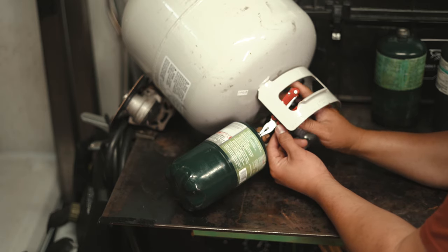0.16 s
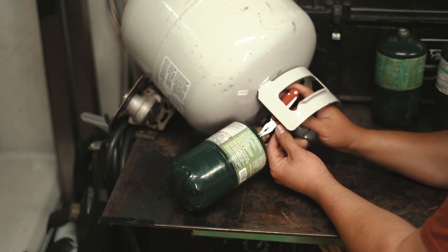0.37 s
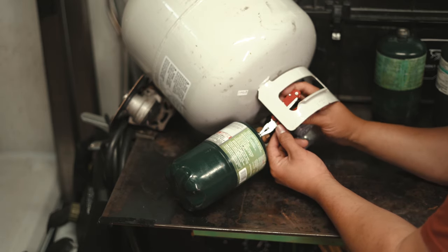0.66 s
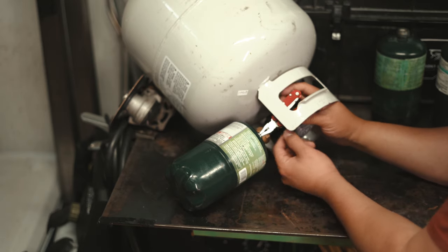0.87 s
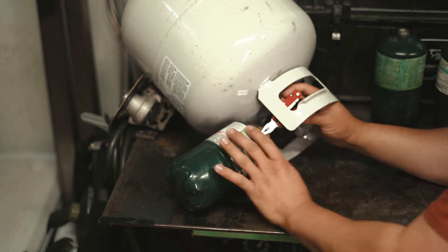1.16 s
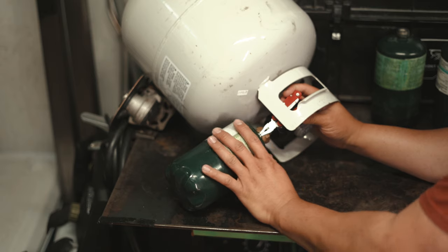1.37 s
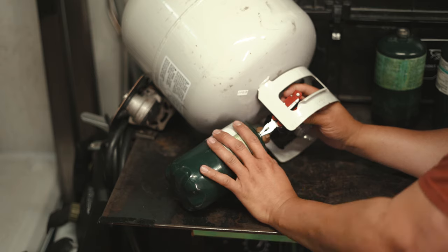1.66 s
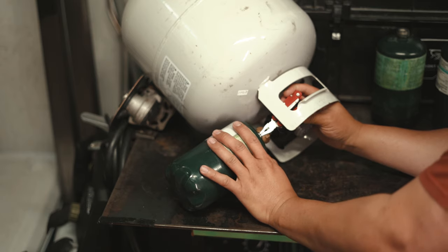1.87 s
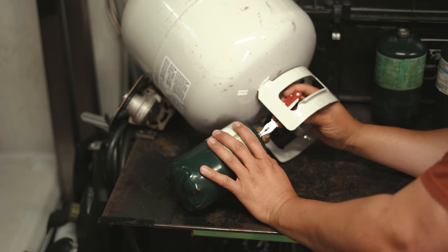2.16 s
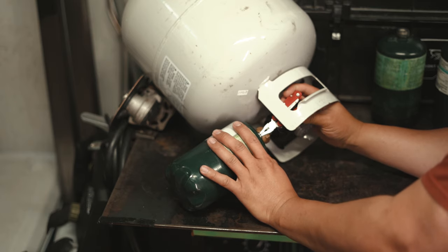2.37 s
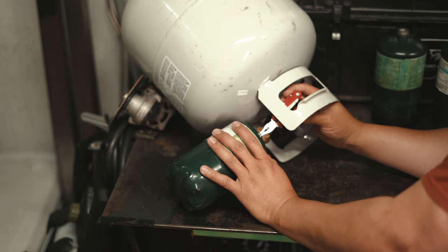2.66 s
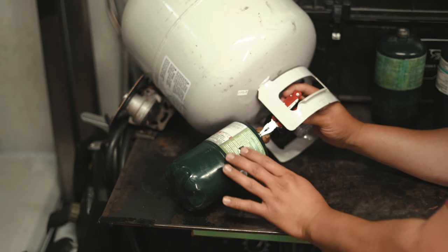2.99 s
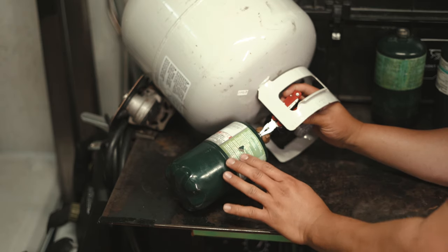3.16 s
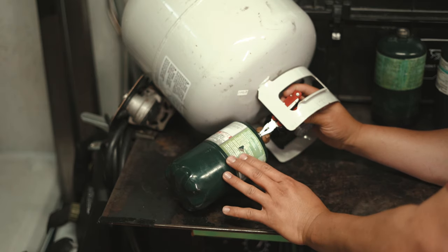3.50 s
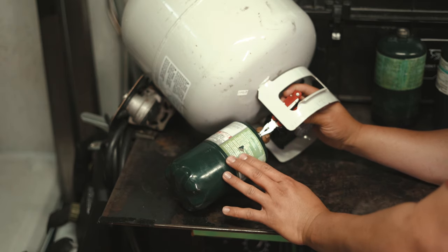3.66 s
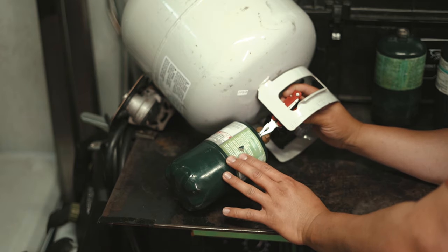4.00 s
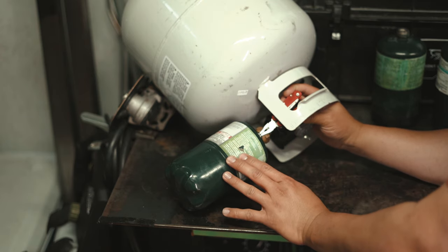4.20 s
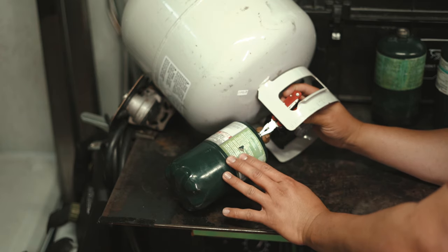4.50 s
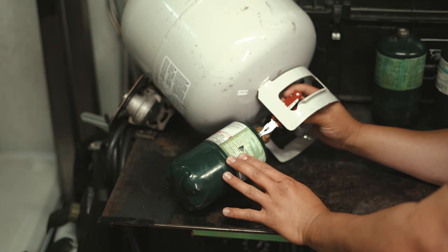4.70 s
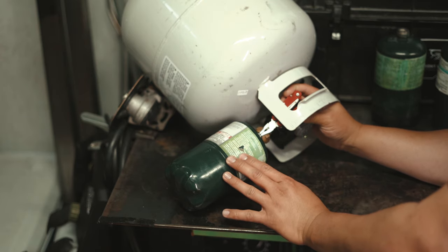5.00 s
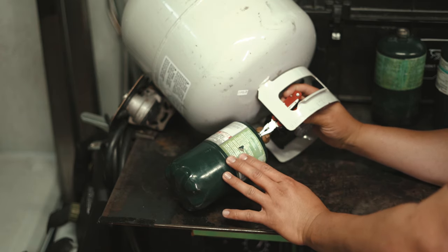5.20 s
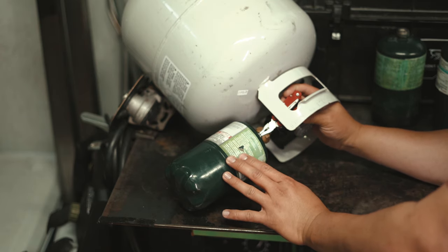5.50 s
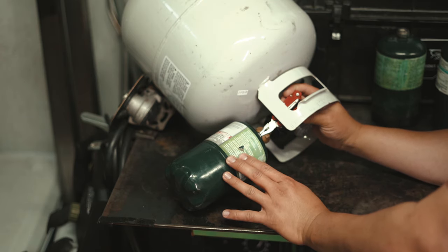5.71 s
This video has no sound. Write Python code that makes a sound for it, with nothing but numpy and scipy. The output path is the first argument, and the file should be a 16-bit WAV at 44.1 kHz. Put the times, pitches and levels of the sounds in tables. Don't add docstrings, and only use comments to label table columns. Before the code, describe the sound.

Low, soft machinery rumble fills a small workshop, recorded close. From 0 to 1.6 seconds, dry skin and a tool scrape a brass fitting in short, patchy rubs, with crisp clicks at about 0.5, 1.0, 1.2 and 1.4, the strongest near 1.0 and 1.2, ringing only briefly. A faint leak precedes a hard gas blast from 1.8 to 2.35: dense, bright hiss with narrow whistling cavity tones and a slight steel hum. It drops to weak seepage, with sharp, wet spits and dull little thuds from 2.4 to 2.95, then an airy hand swish and one more spit near 3.35. Further blasts come at 3.6-3.8, 4.2-4.7, 4.95-5.2 and 5.6-5.9, snapping on and closing quickly; the third sags and stutters, the fourth swells slightly, the last fades somewhat. Liquid roughens the last three onsets. Automatic gain ducks the rumble under each blast, and it returns in the gaps.

```python
import sys
import numpy as np
from scipy import signal
from scipy.fft import rfft, irfft
from scipy.io import wavfile
from scipy.ndimage import uniform_filter1d, map_coordinates

SR = 44100
rng = np.random.default_rng(int(sys.argv[2]) if len(sys.argv) > 2 else 0)


def to_wav(s):
    ch = np.atleast_2d(s).T
    pcm = np.round(np.clip(ch, -1, 1) * 32767)
    wavfile.write(sys.argv[1], SR, pcm.astype(np.int16))


def makeup_ratio(level_db):
    decades = np.asarray(level_db, float) / 20
    return 10 ** decades


N = 257984

# frequency in Hz, level in dB per Hz.
ROOM_COLOUR = [(15, -35), (25, -5.5), (113, -2), (300, -16), (372, -12.5), (438, -17.5), (860, -15),
               (1100, -18), (1190, -17), (1740, -23.5), (2150, -25.5), (2530, -31), (2900, -28.5),
               (5250, -37.5), (15900, -29)]
# frequency in Hz, width in Hz, boost in dB.
ROOM_MODES = [(66.5, 4.5, 3.5), (111.7, 4.7, 3.5), (142.4, 7.9, 2.5)]
# frequency in Hz, level in dB per Hz.
RUB_COLOUR = [(1500, -5.5), (3000, -2), (5000, -1.5), (8000, 3), (12000, -9), (15800, -3)]
# start in seconds, level in dB, seconds to lose 30 dB,
# top octave in dB over the level.
SCRAPES = [(0.0, -38.5, 0.25, -4), (.134, -45.5, 0.3, -4), (0.422, -38.5, 0.12, -5), (.526, -41, 0.16, 3),
           (.594, -40.5, 0.3, -2), (.814, -47, 1.1, -2), (1.006, -37.5, 0.24, -10), (1.192, -39, 0.63, 0.5),
           (1.566, -43, 0.15, -5)]
# start in seconds, length in seconds, level in dB,
# top octave in dB over the level.
SLIDES = [
    (0.883, 0.093, -38.5, 4.5),
    (1.12, 0.11, -55.5, -7),
    (1.192, 0.054, -53, 6),
    (1.3, 0.072, -44, 3),
    (1.38, 0.12, -46, -1),
    (1.252, 0.29, -55, 1),
    (2.957, 0.11, -40.5, 12),
]
# time in seconds, low edge in
# Hz, high edge in Hz, level in dB.
WISPS = [(.28, 4100, 5200, -62), (1.37, 4600, 6300, -50), (3.16, 13000, 14600, -36),
         (3.63, 9000, 10300, -32), (4.46, 13700, 15200, -23), (4.58, 14400, 15900, -26),
         (4.58, 9400, 11200, -30), (4.58, 6850, 8350, -28), (5.62, 6450, 8200, -21)]
# time in seconds, peak in dB, centre in Hz, shell ring in dB over
# the peak, brass ring in dB over the peak.
TAPS = [(0.1321, -34, 3650, -26, -21), (0.4205, -33, 4220, -29, -20), (0.5244, -12, 12300, -46, -19),
        (0.595, -23.5, 5730, -26, -20), (0.8139, -23, 3460, -21, -12.5), (0.8969, -27, 5570, -28, -16),
        (1.0045, -9, 7400, -25.5, -7), (1.1468, -27.5, 2720, -20, -24), (1.193, -8.5, 8550, -24.5, -14.5),
        (1.4187, -18, 8630, -28, -28), (1.5673, -40, 4550, -26, -23), (1.6963, -33, 8500, -40, -16.5)]
# time in seconds, peak in dB, centre in Hz.
FIRST_TOUCH = [
    (.999, -24, 5000),
]
# frequency in Hz, level in dB, T60 in seconds.
BRASS_MODES = [
    (3460, -9.5, 0.067),
    (6230, -8, .04),
    (6720, 4.5, 0.01),
    (7240, -5.5, 0.04),
    (8450, -13, 0.021),
]
# start in
# seconds, length in seconds, frequency in Hz, level in dB, T60 in seconds.
HUMS = [(1.12, .1, 2820, -57, 0.026), (1.25, 0.31, 2850, -51, .03), (1.679, 0.083, 9650, -39, 0.0017),
        (1.688, 0.071, 6300, -40, 0.0033), (1.798, 0.57, 1883, -33, 0.16), (2.39, 0.49, 1858, -48, 0.26),
        (3.187, 0.31, 678, -49, 0.2), (3.882, 0.21, 1350, -50, 0.2), (3.897, 0.085, 2480, -42, 0.13),
        (4.68, 0.23, 1220, -47.5, 0.19), (5.247, 0.41, 371, -49, 0.46), (5.253, 0.26, 1331, -44.5, 0.32),
        (5.3, 0.27, 1098, -49, 0.17)]
# time in seconds, kick in dB.
NUDGES = [
    (3.005, -34),
    (3.025, -32),
    (3.045, -28),
]
# fully open in seconds, let go in seconds,
# dB when open, dB when let go, opening speed in dB per second.
PULLS = [
    (1.797, 2.339, -1, 2, 560),
    (3.608, 3.828, 3, 3, 240),
    (4.18, 4.671, 7.5, -5, 598),
    (4.946, 5.196, 6, 8, 327),
    (5.587, 5.9, 7.5, 1, 284),
]
# time in seconds, core level in dB.
LEAK = [(1.675, -71), (1.69, -46.5), (1.73, -50.5), (2.45, -26.5), (2.52, -30.5), (2.7, -27.5),
        (2.95, -29.5), (3.07, -32), (3.25, -33.5), (3.4, -30), (3.5, -24), (3.97, -36.5), (4.12, -28),
        (4.7, -18.5), (4.81, -24.5), (4.9, -20), (5.33, -32.5), (5.45, -32.5)]
# core in dB, then roar, fringe and whistle in dB over it.
REGISTER_LAW = [(-31, -8.5, -5, 4.5), (-25.5, -9.5, -8, 0), (-20, -17.5, -9.5, -3), (-6, -23, -12, -7.5),
                (3, -19, -6.5, -7), (16.5, -19.5, -5.5, -3.5)]
SPLITS_HZ = (3080, 7450, 13650)
# frequency in Hz, level in dB per Hz.
JET_COLOURS = [
    [(180, -58), (300, -32), (583, -23), (1550, -23.5), (1930, -19), (2470, -18.5), (4350, -5), (4730, -2.5), (6070, -3.5), (8740, -13), (12200, -14), (14600, -9), (15900, -18)],
    [(180, -40), (300, -31.5), (913, -20), (1500, -20), (3120, -13), (3570, -10), (4890, 0.5), (5490, -2.5), (5970, -0.5), (9660, -19), (13200, -18.5), (14400, -10.5), (15900, -11)],
    [(180, -28), (300, -18), (360, -4), (603, -6), (666, 0.5), (773, -19.5), (1320, -5), (3810, -3.5), (5580, -2), (8050, -3.5), (9820, -12.5), (14400, -8), (15900, -8)],
]
# frequency in Hz, width in Hz,
# dB over the jet.
FIRST_GRIP = [(3640, 130, 5), (3960, 61, 6), (4380, 130, 12), (4890, 50, 7.5), (5140, 110, 4.5),
              (5560, 110, 10), (5900, 48, 8.5), (6170, 300, 10), (6860, 60, 0), (9330, 150, 9.5),
              (11300, 90, -4), (12300, 200, -5), (14200, 90, 3), (14900, 270, 4)]
# frequency in Hz, width in Hz, dB over the jet.
SECOND_GRIP = [(3527, 93, 6), (3780, 59, 9), (4150, 45, 8), (4630, 20, 5.5), (4924, 83, 6), (5125, 17, 9.5),
               (5880, 27, 9), (6020, 95, 8), (6540, 110, -2.5), (6780, 120, 7.5), (8050, 88, 2),
               (8500, 220, -10), (13000, 540, 8.5), (14300, 300, 8)]
# frequency in Hz, width in Hz, dB over the jet.
NEARLY_SHUT = [(4520, 100, 4), (5120, 99, 9), (5550, 480, 8.5), (6170, 260, 7.5), (7200, 500, -2),
               (7930, 160, 6), (8500, 250, 3), (9300, 180, 8), (13000, 400, 7), (13400, 300, 3),
               (14200, 150, 10), (14800, 220, 5), (15500, 160, 6)]
HAND_MOVES_S = (2.94, 3.4)
HAND_DB = (-1, -1.1, 1, 0.6)
WET_AT_S = (4.185, 4.97, 5.575)
WET_DB = (9, -1.5, 0, -2)
# start in seconds, length in seconds, extra depth in dB.
STUTTER_FITS = [
    (2.58, .48, .9),
    (4.53, .46, .9),
]
# time in seconds, peak in dB, thud in dB over the peak.
DROPS = [(2.4423, -7.5, -8.5), (2.4567, -13, -7), (2.6457, -13, -5.5), (2.6601, -11.5, -4.5),
         (2.6824, -21, -10), (2.696, -15, -10), (2.7043, -18, -13), (2.729, -5.5, -12), (2.7527, -5.5, -14),
         (2.8492, -10, -8.5), (2.8783, -15, -3), (2.9203, -7.5, -13), (2.9552, -12, -23), (3.36, -16, -7)]
# jet core in the air in dB, gain in dB.
GAIN_LAW = [(-14.5, -0.03), (-7, -6.5), (2, -18.5), (16.5, -33)]


def unit(x):
    return x / np.sqrt(np.mean(x ** 2))


def curve(table):
    s, *columns = np.transpose(table)
    return [np.interp(np.arange(N) / SR, s, column) for column in columns]


def colour(x, points):
    hz, db = np.transpose(points)
    bins = np.arange(N // 2 + 1) * SR / N + 1
    return irfft(rfft(x) * makeup_ratio(np.interp(np.log(bins), np.log(hz), db)), N)


def band(x, lo_hz, hi_hz, order=2):
    sos = signal.butter(order, [lo_hz, min(hi_hz, .45 * SR)], "bandpass", fs=SR, output="sos")
    return signal.sosfilt(sos, x)


def resonate(x, modes):
    hz = np.arange(N // 2 + 1) * SR / N
    return rfft(x) * makeup_ratio(sum(db / (1 + (2 * (hz - f) / width) ** 2) for f, width, db in modes))


def ring(x, hz, t60):
    pole = np.exp(2j * np.pi * hz / SR - np.log(1000) / (t60 * SR))
    return signal.lfilter([1], [1, -pole], x).imag


def kicks(times, db):
    x = np.zeros(N)
    x[(np.asarray(times) * SR).astype(int)] = makeup_ratio(db)
    return x


def crack(s, db, hz, t60, spread):
    t = np.arange(2048) / SR
    push = rng.standard_normal(len(t)) * 1000 ** (-t / t60)
    push[0] = 6
    burst = band(push, hz / spread, hz * spread)
    x = np.zeros(N)
    start = int(s * SR)
    x[start:start + len(t)] = makeup_ratio(db) * burst / np.abs(burst).max()
    return x


def walk(rate):
    hold = int(SR / rate)
    steps = np.repeat(rng.standard_normal(N // hold + 1), hold)
    return unit(uniform_filter1d(uniform_filter1d(steps, hold), hold)[:N])


def window(s, length):
    t = np.arange(N) / SR - s
    return np.clip(np.minimum(t, length - t) / min(.03, length / 2), 0, 1)


def lag(x, s):
    keep = np.exp(-1 / (s * SR))
    return x[0] + signal.lfilter([1 - keep], [1, -keep], x - x[0])


def room():
    level_db, swell_db = -36.5, 1.6
    noise = unit(irfft(resonate(colour(rng.standard_normal(N), ROOM_COLOUR), ROOM_MODES), N))
    bass = band(noise, 23, 250)
    return makeup_ratio(level_db) * (noise + bass * (makeup_ratio(swell_db * walk(9)) - 1))


def rub():
    rise_s, body_ceiling_db = .014, -35
    t = np.arange(N) / SR
    strokes = []
    for s, db, fall_s, top_db in SCRAPES:
        drop_db = 30 * np.maximum((s - t) / rise_s, (t - s) / fall_s)
        strokes.append((makeup_ratio(db - drop_db), top_db))
    for s, length, db, top_db in SLIDES:
        strokes.append((makeup_ratio(db) * window(s, length) ** 2, top_db))
    body = sum(stroke for stroke, _ in strokes)
    top = sum(stroke * makeup_ratio(top_db) for stroke, top_db in strokes)
    noise = colour(rng.standard_normal(N), RUB_COLOUR)
    body_hiss = np.minimum(body, makeup_ratio(body_ceiling_db)) * unit(band(noise, 790, 7600))
    top_hiss = top * unit(band(noise, 8900, 14800))
    return (body_hiss + top_hiss) * makeup_ratio(walk(90))


def wide_air():
    noise = rng.standard_normal(N)
    wisps = sum(makeup_ratio(db) * window(s - .015, 0.031) * unit(band(noise, lo, hi, order=8))
                for s, lo, hi, db in WISPS)
    hiss = unit(band(noise, 10900, 22000, order=4))
    return wisps + makeup_ratio(-63.5) * window(-0.98, 2.7) * hiss


def clicks():
    s, db, hz, _, brass_db = np.transpose(TAPS)
    blows = kicks(s, db + brass_db)
    brass = sum(makeup_ratio(mode_db) * ring(blows, f, t60) for f, mode_db, t60 in BRASS_MODES)
    snap = sum(crack(*row, .002, 2.6) for row in [*zip(s, db + 3, hz), *FIRST_TOUCH])
    rattle = sum(crack(*row, 0.053, 1.13) for row in zip(s, db - 9.5, hz))
    return snap + rattle + brass


def shell():
    shell_hz, shell_t60_s = 1868, .27
    hum = sum(makeup_ratio(db + walk(20)) * window(s, length) * unit(ring(rng.standard_normal(N), hz, t60))
              for s, length, hz, db, t60 in HUMS)
    s, db, _, shell_db, _ = np.transpose(TAPS)
    blows = kicks(s, db + shell_db) + kicks(*np.transpose(NUDGES))
    return hum + ring(blows, shell_hz, shell_t60_s)


def flow_db():
    closing_db_per_s = 359
    t = np.arange(N) / SR
    levels = curve(LEAK)
    for on, off, on_db, off_db, opening_db_per_s in PULLS:
        held_db = np.interp(t, (on, off), (on_db, off_db))
        opening_db = opening_db_per_s * np.maximum(on - t, 0)
        levels.append(held_db - opening_db - closing_db_per_s * np.maximum(t - off, 0))
    return 10 * np.log10(sum(makeup_ratio(db) ** 2 for db in levels))


def cavities(points, modes):
    hz = np.arange(N // 2 + 1) * SR / N
    spectrum = resonate(colour(rng.standard_normal(N), points), modes)
    below = [0] + [1 / (1 + (hz / f) ** 16) for f in SPLITS_HZ] + [1]
    return np.array([unit(irfft(spectrum * (hi - lo), N)) for lo, hi in zip(below, below[1:])])


def jet():
    colour_lag_s = 0.036
    dry_colour_db = -22.5
    shut_db, open_db = -26, -19.5
    wet_s, stutter_db = 0.22, .4
    t = np.arange(N) / SR
    core_db = flow_db()
    felt_db = np.maximum(core_db, lag(core_db, colour_lag_s))
    felt_db = np.where(t < PULLS[0][0], np.maximum(felt_db, dry_colour_db), felt_db)
    at_db, *law = np.transpose(REGISTER_LAW)
    roar_db, fringe_db, whistle_db = (np.interp(felt_db, at_db, column) for column in law)

    moved = np.interp(t, HAND_MOVES_S, (0, np.pi / 2))
    first = cavities(JET_COLOURS[0], FIRST_GRIP)
    second = cavities(JET_COLOURS[1], SECOND_GRIP)
    wide = np.cos(moved) * first + np.sin(moved) * second
    opening = np.interp(felt_db, (shut_db, open_db), (0, np.pi / 2))
    registers = np.sin(opening) * wide + np.cos(opening) * cavities(JET_COLOURS[2], NEARLY_SHUT)

    wet = sum(window(s, wet_s) for s in WET_AT_S)
    slugs = walk(110)
    stutter = unit(slugs - uniform_filter1d(slugs, size=3000))
    depth_db = stutter_db + sum(db * window(s, length) for s, length, db in STUTTER_FITS)
    surge_db = depth_db * stutter
    levels = [core_db + rel_db + wet_db * wet + hand_db * np.sin(moved) + surge_db + .5 * walk(60)
              for rel_db, wet_db, hand_db in zip((roar_db, 0, fringe_db, whistle_db), WET_DB, HAND_DB)]
    return (registers * makeup_ratio(levels)).sum(axis=0) * window(LEAK[0][0] - .02, 10)


def tremble(x):
    slip = np.cumsum(.004 * walk(5))
    slip = slip - uniform_filter1d(slip, size=SR)
    return map_coordinates(x, [np.arange(N) + slip], order=5, mode="nearest")


def spits():
    tick = sum(crack(s, db, 5400, .006, 1.25) for s, db, _ in DROPS)
    thud = sum(crack(s, db + thud_db, 850, 0.036, 4.0) for s, db, thud_db in DROPS)
    return tick + thud


def bench(x):
    t = np.arange(SR // 4) / SR
    echo = np.zeros(len(t))
    for db, t60 in [(-20, .02), (-12, .22)]:
        decay = 1000 ** (-t / t60) * np.sqrt(2 * np.log(1000) / (t60 * SR))
        echo += makeup_ratio(db) * rng.standard_normal(len(t)) * decay
    echo[0] = 1
    return signal.fftconvolve(x, echo / np.linalg.norm(echo))[:N]


def camera_db():
    recover_s = 0.0088
    wanted_db = np.interp(flow_db(), *np.transpose(GAIN_LAW))
    return np.minimum(wanted_db, lag(wanted_db, recover_s))


def scene():
    mid = bench(tremble(jet()) + spits() + rub() + clicks()) + shell() + room()
    side = wide_air() * makeup_ratio(-camera_db())
    return np.array([mid + side, mid - side])


def roll_off(x):
    return signal.sosfilt(signal.butter(12, 16550, fs=SR, output="sos"), x)


def record(dry):
    ceiling, top_hz, bottom_hz = .85, 15720, 38
    x = dry * makeup_ratio(camera_db())
    mid = x.mean(axis=0)
    x = x - mid + ceiling * np.tanh(mid / ceiling)
    x = signal.sosfilt(signal.ellip(14, .2, 90, top_hz, fs=SR, output="sos"), x)
    x = signal.sosfilt(signal.butter(3, bottom_hz, "highpass", fs=SR, output="sos"), x)
    return roll_off(x)


dry = scene()
out = record(dry)
to_wav(out)
```